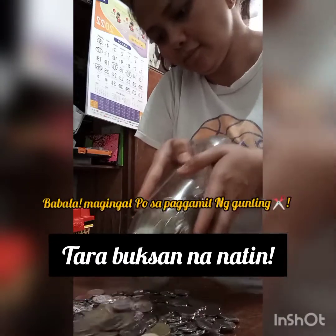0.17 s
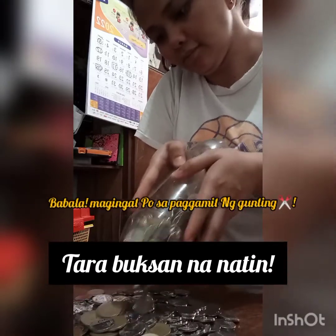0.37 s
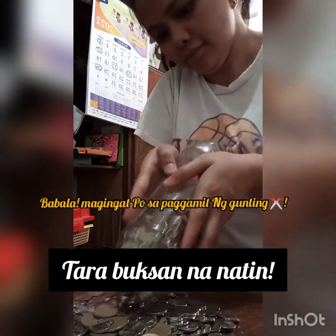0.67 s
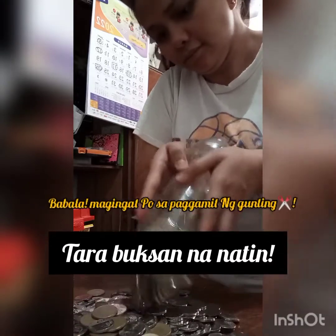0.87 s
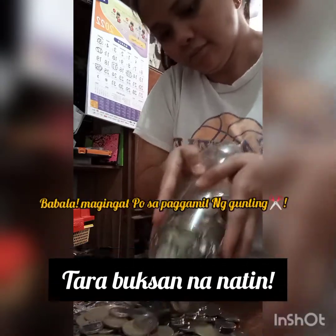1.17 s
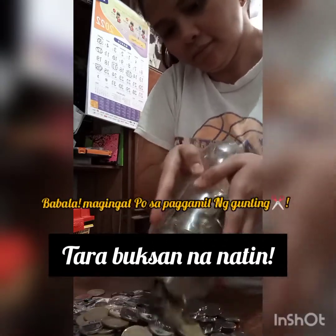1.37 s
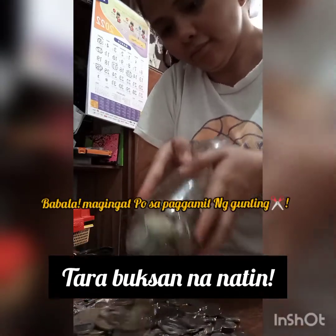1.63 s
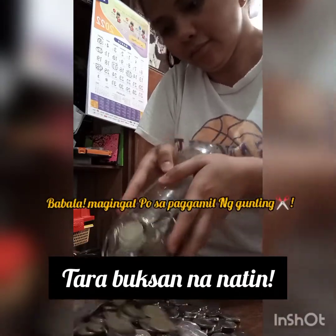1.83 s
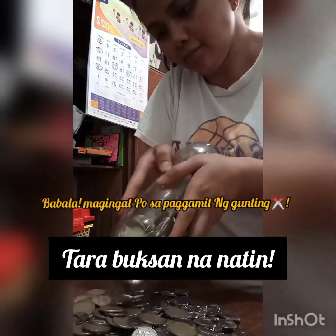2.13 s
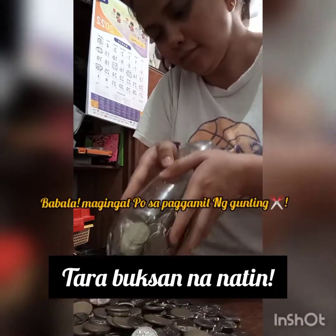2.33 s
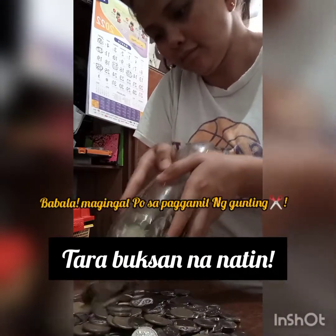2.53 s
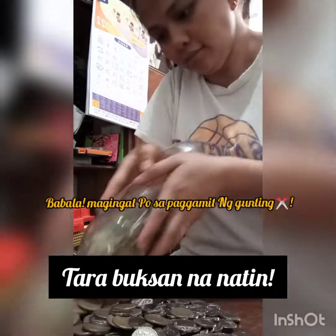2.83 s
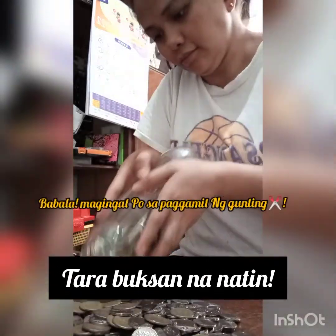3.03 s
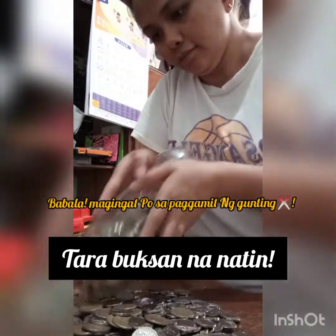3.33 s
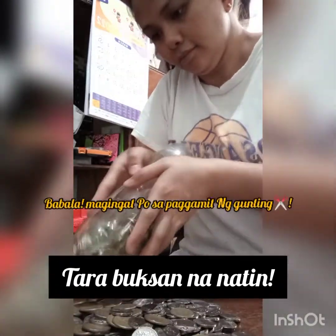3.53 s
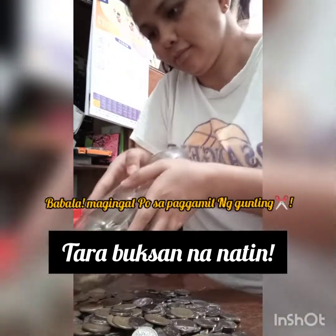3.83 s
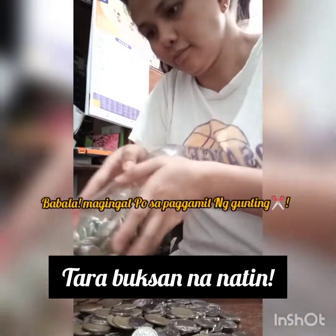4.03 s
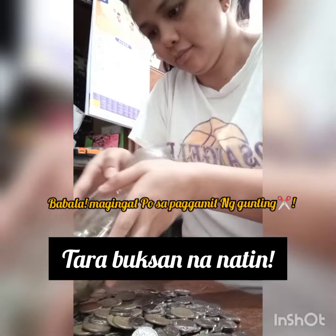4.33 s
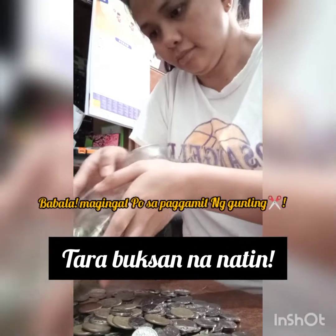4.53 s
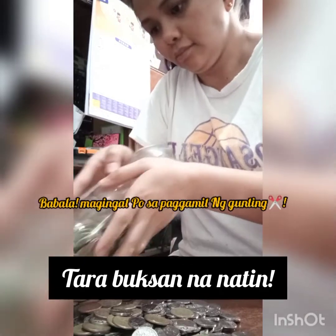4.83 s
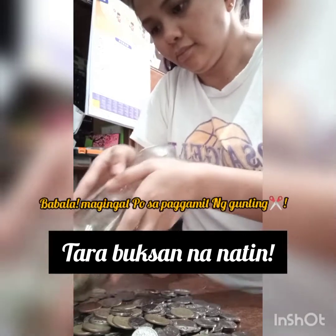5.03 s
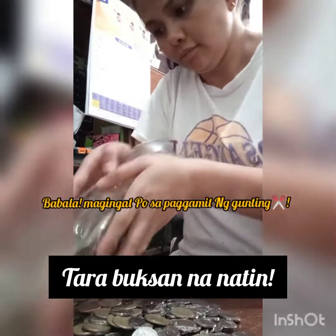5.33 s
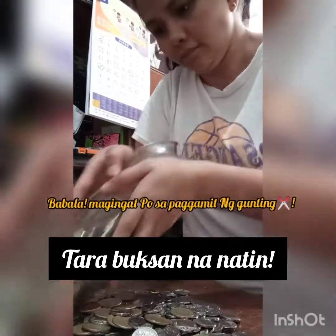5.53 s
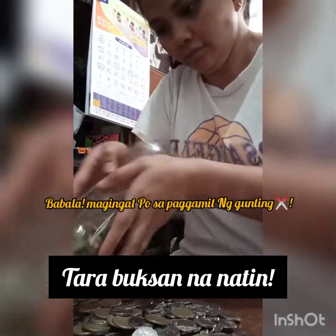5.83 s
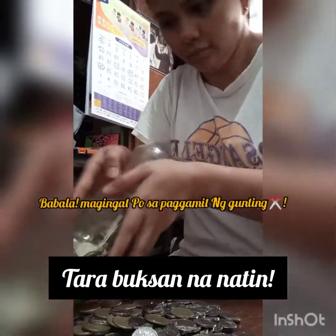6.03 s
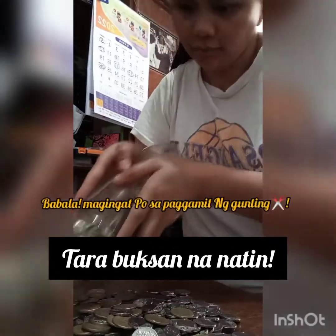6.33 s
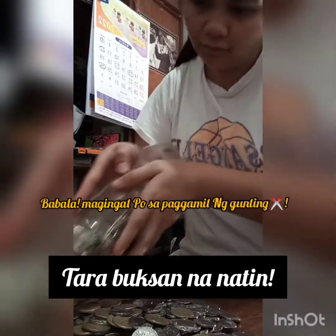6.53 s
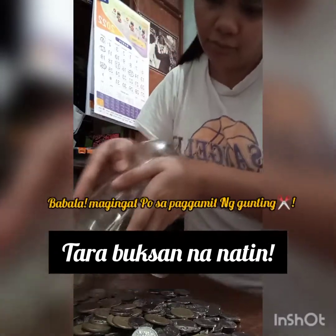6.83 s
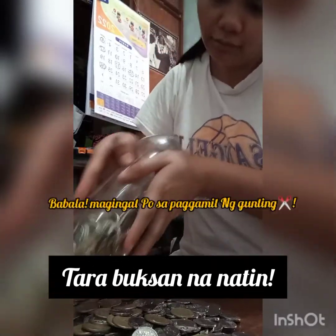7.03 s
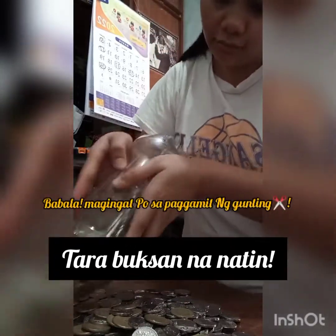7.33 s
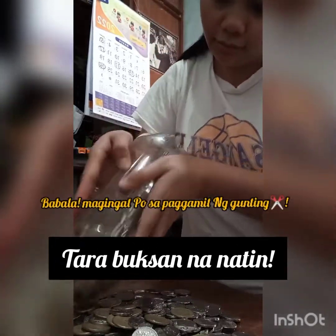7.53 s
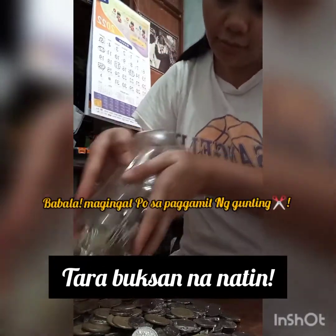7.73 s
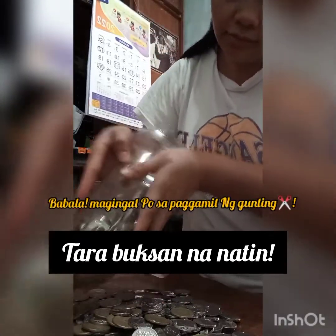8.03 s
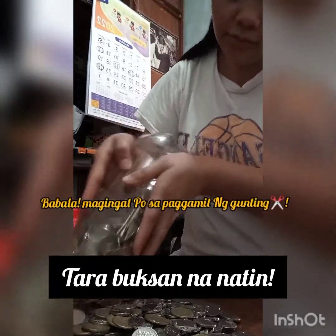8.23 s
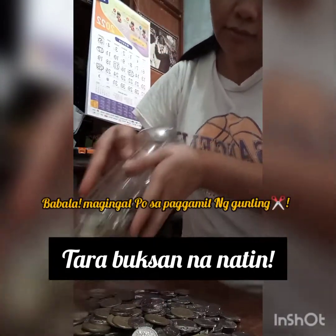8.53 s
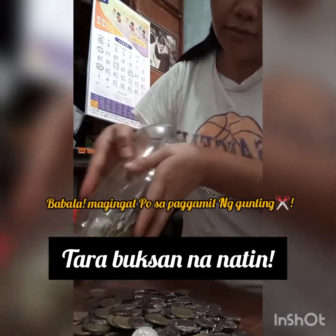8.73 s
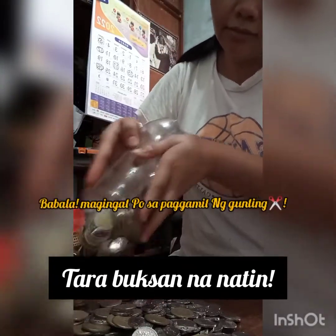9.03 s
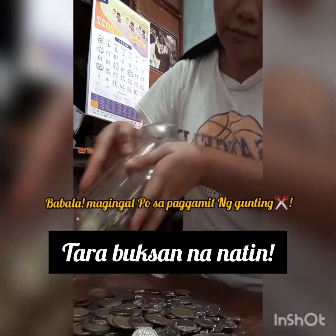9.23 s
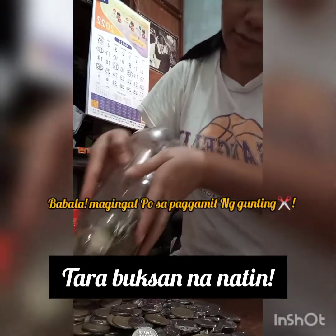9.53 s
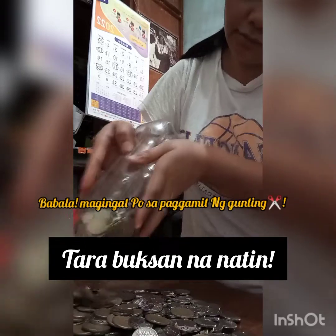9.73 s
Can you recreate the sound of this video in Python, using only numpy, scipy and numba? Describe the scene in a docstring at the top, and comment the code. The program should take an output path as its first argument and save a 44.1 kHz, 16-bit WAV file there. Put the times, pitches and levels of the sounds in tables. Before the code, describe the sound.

A dense, steady metallic rattle pulses four to five times a second as a coin-filled plastic bottle is shaken out over a table.

```python
"""A plastic bottle of coins, close to a small microphone, shaken four to five times a second over a table.
It pours onto a heap of coins: each collision is a noisy rattle of contact and briefly ringing coin modes.
The load raps the bottle too, and its wall and air hum in modes of their own.
Behind it: knocks of the table under the microphone, the short dull tails of a small room, and room tone."""
import sys
import numpy as np
from scipy import signal
from scipy.io import wavfile
from numba import njit

SR = 44100
rng = np.random.default_rng(int(sys.argv[2]) if len(sys.argv) > 2 else 0)


def put_to_file(sound):
    """Save the sound as 16-bit audio at rate SR, in the file named by the first command-line argument."""
    columns = np.atleast_2d(sound).T  # one column per channel
    safe = np.clip(columns, -1, 1)
    whole_steps = np.round(safe * 32767)
    wavfile.write(sys.argv[1], SR, whole_steps.astype(np.int16))


N = 436149  # length in samples


def amp(db):
    """Amplitude of a level in dB."""
    return 10 ** (np.asarray(db) / 20)


def evened(x):
    """Scales to rms 1."""
    return x / np.sqrt(np.mean(x ** 2) + 1e-20)


def curves(rows, s):
    """Reads every column of a table at times s."""
    at, *columns = np.transpose(rows)
    return [np.interp(s, at, column) for column in columns]


def coloured(x, points):
    """Causal minimum-phase filter with the given spectrum, its taps scaled to unit energy."""
    hz, db = np.transpose(points)
    f = np.abs(np.fft.fftfreq(4096, 1 / SR))
    log_gain = np.interp(np.log(f + 1), np.log(hz), db) * np.log(10) / 20
    spectrum = np.exp(np.conj(signal.hilbert(log_gain)))
    taps = np.fft.ifft(spectrum).real[:2048]
    return signal.oaconvolve(x, taps / np.linalg.norm(taps))[:N]


@njit
def rings(start, turn, fade, size, length, rise, total):
    """Sums dying sines, each swelling in from its own start."""
    out = np.zeros(total)
    for k in range(len(start)):
        z, step, missing = size[k] + 0j, fade[k] * np.exp(1j * turn[k]), 1.
        for n in range(start[k], min(start[k] + length[k], total)):
            out[n] += z.imag * (1 - missing)
            z *= step
            missing *= rise
    return out


def struck(s, size, modes, uneven_db, drift_db, rise_s):
    """Every blow rings all modes, detuned and weighted by piece and place; rms 1 per unit blow a second."""
    hz, spread, db, t60 = np.transpose(modes)
    detune, place, touch = rng.standard_normal((len(s), len(hz), 3)).transpose(2, 0, 1)
    # the load shifts about ten times a second
    knots = rng.standard_normal((len(hz), 2, 100))
    drift, lean = (np.transpose([np.interp(s * 10, np.arange(100), k[j]) for k in knots]) for j in range(2))
    ring_s = t60 * np.exp(0.27 * touch)  # neighbours damp each ring by chance
    weight = amp(db + uneven_db * np.clip(place, -2, 2) + drift_db * drift)
    weight /= np.sqrt(np.mean(np.sum(weight ** 2 * ring_s, 1)) / (4 * np.log(1000)))
    start = np.repeat((s * SR).astype(int), len(hz))
    pitch_hz = np.clip(hz + spread * (0.6 * detune + 0.8 * lean), 50, SR / 2.1)
    turn = 2 * np.pi * pitch_hz.ravel() / SR
    fade = 1000 ** (-1 / (ring_s.ravel() * SR))
    length = (ring_s.ravel() * SR / 2).astype(np.int64)  # each ring is cut 30 dB down
    blow = (weight * size[:, None]).ravel()
    return rings(start, turn, fade, blow, length, np.exp(-1 / (rise_s * SR)), N)


def rattle(s, size, points, chatter_s):
    """Bare contacts chatter for a few milliseconds: noise bursts through a spectrum; rms 1 per unit blow a second."""
    power = np.zeros(N)
    np.add.at(power, (s * SR).astype(int), size ** 2 * SR)
    for time_s in (chatter_s, chatter_s / 4):  # slow decay, then a quicker smoothing of the onset
        keep = np.exp(-1 / (time_s * SR))
        power = signal.lfilter([1 - keep], [1, -keep], power)
    return coloured(np.sqrt(power) * rng.standard_normal(N), points)


def collisions(level_db, count, spread_db):
    """Random times, crowded where the load moves hardest, and sizes, mostly small, that add up to the level."""
    when, size = rng.random((count, 2)).T
    crowd = amp(level_db / 2)
    crowd /= crowd.mean()
    share = (np.arange(count) + when) / count
    at = np.searchsorted(np.cumsum(crowd) / N, share).clip(0, N - 1)
    size = evened(amp(-spread_db * np.log(size + 0.036)))
    return at / SR, size * amp(level_db[at]) * np.sqrt(N / SR / count / crowd[at])


# Spectrum of the quiet room: f/Hz, level/dB (relative)
ROOM_TONE_SPECTRUM = [(30, -1.5), (1000, -2), (15000, -12)]
ROOM_TONE_DB = -62


def room_tone():
    """Steady noise through the spectrum of the quiet room."""
    return amp(ROOM_TONE_DB) * coloured(rng.standard_normal(N), ROOM_TONE_SPECTRUM)


ROOM_T60, ROOM_DB = 0.069, -10  # decay in s, level of the tails against the near sound


def room(x):
    """A small room: three short dull noise tails mixed in turning shares, so that no one colour stands out."""
    t, turn = np.arange(SR // 4) / SR, 2 * np.pi * 3.1 * np.arange(N) / SR
    dull = signal.lfilter([.6], [1, -.4], rng.standard_normal((3, len(t))))
    tails = dull * amp(-60 * t / ROOM_T60) * (t > .004)
    shares = np.sqrt(2 / 3) * np.cos(turn + np.arange(3)[:, None] * np.pi / 3)
    return signal.oaconvolve(x * shares, tails / np.linalg.norm(tails[0]), axes=1).sum(0)[:N]


# Knocks carried by the table: t/s, level/dB (scale of the swing), length of the first dip/s
TABLE_THUMPS = [(4.859, -21.5, 0.0012), (8.51, -33, 0.0045), (9.223, -30, 0.0015)]
TABLE_HZ = 100


def thumps():
    """A first dip, then a heavily damped swing of the table top under the microphone."""
    out, t = np.zeros(N), np.arange(3000) / SR
    for s, db, dip_s in TABLE_THUMPS:
        dip = -1.3 * np.sin(np.pi * t / dip_s) * (t < dip_s)
        after = np.maximum(t - dip_s, 0)
        swing = np.sin(2 * np.pi * TABLE_HZ * after) * np.exp(-after / 0.0022)
        part = out[round(s * SR):][:len(t)]
        part += amp(db) * (dip + swing)
    return out


# Tilt and grip: t/s, level/dB of sliding clatter, level/dB of small coins against it,
# level/dB of bottle tap and ring of wall and air against the rap
GRIP_CURVES = [(0.0, -44, 7.5, -10.5), (0.7, -45, 8, -9.5), (1.16, -40, 8.5, -5), (1.75, -38.5, 2, -7.5),
               (2.33, -42, 4.5, -5), (2.91, -39.5, -2.5, -8.5), (3.49, -41, -3, -7.5), (4.2, -45, 0, -2.5),
               (4.23, -42, 7, -16.5), (4.65, -42, 3.5, -1), (5.82, -41, -11, -6), (6.4, -45, -3, -2),
               (6.98, -43, -5, -4.5), (7.56, -42, -12, -3.5), (8.14, -42, -3, 0.5), (8.73, -44, 1, -3.5),
               (9.31, -41, -5, -3.5), (9.89, -38, -4, -6)]
# Strokes that throw the load against the plastic: t/s (start), length/s, level/dB of the rap
LOAD_STROKES = [(0.027, 0.033, -42.5), (0.262, 0.017, -41), (0.481, 0.029, -41.0), (0.704, 0.032, -41.5),
                (0.938, 0.038, -38.0), (1.155, 0.029, -44.5), (1.36, 0.06, -46.0), (1.576, 0.075, -46.5),
                (1.815, 0.06, -48.5), (1.973, 0.33, -54.0), (2.487, 0.016, -42.5), (2.695, 0.02, -46.0),
                (2.922, 0.025, -44.0), (3.037, 0.16, -51), (3.324, 0.063, -52.5), (3.556, 0.031, -49.5),
                (3.771, 0.02, -42), (3.96, 0.035, -46.0), (4.185, 0.03, -44), (4.238, 0.19, -45),
                (4.549, 0.073, -48.5), (4.785, 0.09, -44.5), (5.022, 0.031, -42), (5.221, 0.037, -45.5),
                (5.434, 0.025, -43.0), (5.638, 0.018, -47.0), (5.87, 0.017, -41.0), (6.066, 0.033, -44.0),
                (6.297, 0.031, -44.5), (6.482, 0.067, -47.5), (6.723, 0.04, -44.0), (6.927, 0.03, -39.5),
                (7.146, 0.048, -48.0), (7.367, 0.054, -40.0), (7.601, 0.031, -38.5), (7.813, 0.032, -35.5),
                (8.008, 0.025, -46), (8.05, 0.045, -39.5), (8.287, 0.044, -49.5), (8.509, 0.06, -43.0),
                (8.747, 0.034, -45.5), (8.961, 0.03, -44.5), (9.061, 0.1, -52.0), (9.209, 0.022, -40.0),
                (9.433, 0.031, -41.5), (9.602, 0.09, -48.5), (9.847, 0.04, -46.0)]
# Moments when the coins stop sliding: t/s (start), t/s (end), level/dB (depth)
SLIDING_LULLS = [(0.354, 0.402, 12), (0.561, 0.642, 8), (0.74, 0.834, 13), (2.327, 2.44, 5),
                 (3.418, 3.52, 7), (3.788, 3.941, 17), (3.992, 4.157, 14), (4.42, 4.497, 8),
                 (5.26, 5.33, 8.5), (5.454, 5.545, 25.5), (5.661, 5.704, 13), (6.091, 6.221, 12),
                 (6.547, 6.689, 9.5), (6.972, 7.063, 11), (7.169, 7.271, 15), (7.418, 7.498, 8.5),
                 (7.63, 7.73, 15), (7.881, 8, 8), (8.169, 8.269, 10), (8.77, 8.941, 12.5)]
SWELL_DB_PER_S, SETTLE_DB_PER_S = 519.5, 420.5  # the load arrives, then comes to rest
STROKE_CLATTER_DB = 0.99  # coin on coin against the rap in a stroke
SLIDE_RAP_DB = -14.5  # rap of sliding coins against their clatter
HUSH_S, RESUME_S = .04, .008  # a lull deepens gradually and ends abruptly


def motion():
    """Levels of rap and clatter in dB: strokes over coins that slide except in the lulls."""
    t = np.arange(0, N / SR, .002)
    start, length, db = np.transpose(LOAD_STROKES)[..., None]
    swell_db = SWELL_DB_PER_S * np.maximum(start - t, 0)
    settle_db = SETTLE_DB_PER_S * np.maximum(t - start - length, 0)
    strokes = np.sum(amp(db - swell_db - settle_db) ** 2, 0)
    start, end, depth_db = np.transpose(SLIDING_LULLS)[..., None]
    still = np.clip(np.minimum((t - start) / HUSH_S, (end - t) / RESUME_S + 1), 0, 1)
    slides = amp(curves(GRIP_CURVES, t)[0] - np.sum(depth_db * still, 0)) ** 2
    rap = strokes + amp(SLIDE_RAP_DB) ** 2 * slides
    clatter = amp(STROKE_CLATTER_DB) ** 2 * strokes + slides
    return [np.interp(np.arange(N) / SR, t, 10 * np.log10(power)) for power in (rap, clatter)]


# Single coins that strike the bottle wall: t/s, level/dB (before the mix gains)
WALL_KNOCKS = [(4.2126, -19.5), (4.2237, -22.5), (6.325, -35), (6.383, -31.5), (6.464, -35), (7.739, -34.5),
               (9.073, -34), (9.138, -33)]


def knocks():
    """A coin on the wall: a dull tap, and every mode of the wall at once, close to its usual pitch."""
    s, db = np.transpose(WALL_KNOCKS)
    steady_modes = np.multiply(WALL_MODES, [1, .3, 1, 1])  # narrower pitch spread
    wall = struck(s, amp(db), steady_modes, uneven_db=1.5, drift_db=0, rise_s=0.0004)
    tap = rattle(s, amp(db), PLASTIC_SPECTRUM, chatter_s=0.0012)
    return amp(-30.5) * wall + amp(-35.5) * tap


# Runs of coins that keep one note of the bottle sounding: t/s (start), length/s, f/Hz, level/dB
NOTE_RUNS = [(0.927, 0.02, 743, -46.5), (0.995, 0.16, 351, -51.5), (1.819, 0.093, 757, -55.5),
             (2.004, 0.17, 1820, -54.5), (2.017, 0.15, 2120, -52.5), (2.49, 0.046, 191, -53),
             (2.73, 0.17, 1137, -56), (3.011, 0.18, 1866, -52), (3.088, 0.15, 895, -53.5),
             (3.2, 0.22, 1176, -58), (4.25, 0.16, 1196, -53.5), (4.235, 0.18, 2117, -49.5),
             (4.598, 0.34, 2116, -54), (4.703, 0.2, 1210, -55.5), (4.853, 0.22, 2090, -51),
             (5.027, 0.11, 1207, -50.5), (5.223, 0.084, 1190, -50), (5.641, 0.033, 857, -50),
             (5.805, 0.044, 886, -53.5), (6.3, 0.029, 178, -50), (6.385, 0.04, 495, -54),
             (7.152, 0.011, 695, -49), (7.364, 0.068, 680, -48), (7.791, 0.074, 775, -48.5),
             (8.029, 0.053, 813, -44), (8.123, 0.097, 500, -53.5), (8.6, 0.14, 410, -55.5),
             (9.049, 0.15, 1814, -52.5)]
RUN_HITS_PER_S, RUN_T60, RUN_FADE_DB = 300, .07, -4  # mean rate, ring in s, fade over a run


def runs():
    """A quick patter of small blows rings a single mode and weakens as the coins run out."""
    out, t = np.zeros(N), np.arange(SR // 2) / SR
    shape = (len(NOTE_RUNS), len(t))
    hits, sizes = rng.random(shape), rng.standard_normal(shape)
    r = 1000 ** (-1 / (RUN_T60 * SR))
    for (s, length, hz, db), hit, size in zip(NOTE_RUNS, hits, sizes):
        patter = (hit < RUN_HITS_PER_S / SR) * size * (t < length) * amp(RUN_FADE_DB * t / length)
        patter[0] = 1
        note = signal.lfilter([1], [1, -2 * r * np.cos(2 * np.pi * hz / SR), r * r], patter)
        out[round(s * SR):][:len(t)] += amp(db) * evened(note) * np.sqrt(length / t[-1])
    return out


# Loud single collisions: t/s, level/dB of large coins, level/dB of small coins (before the mix gains)
COIN_CLINKS = [(0.45, -45, -14), (0.651, -47.5, -23), (0.966, -28.5, -31), (1.074, -38, -23),
               (2.485, -27.5, -37), (3.673, -48, -42), (4.2253, -30.5, -18), (4.504, -43, -23),
               (4.8578, -23, -14), (5.55, -46, -32), (5.6451, -32, -40), (5.871, -30.5, -53),
               (6.72, -32, -32), (7.155, -30.5, -44), (7.6053, -31, -42), (8.287, -32, -42),
               (8.977, -33, -20)]


def clinks():
    """The loudest collisions ring the coins; the large coins' blow rings and taps the plastic too."""
    s, large_db, small_db = np.transpose(COIN_CLINKS)
    large, small = amp(large_db), amp(small_db)
    metal = amp(-28) * struck(s, large, LARGE_COIN_MODES, uneven_db=3, drift_db=0, rise_s=0.0003)
    metal += amp(-28.5) * struck(s, small, SMALL_COIN_MODES, uneven_db=3, drift_db=0, rise_s=0.0003)
    metal += amp(-27) * rattle(s, large, METAL_SPECTRUM, chatter_s=0.003)
    bottle_modes = RAP_MODES + WALL_MODES + HOLLOW_MODES
    plastic = amp(-34.5) * struck(s, large, bottle_modes, uneven_db=4.5, drift_db=-5.5, rise_s=0.00036)
    plastic += amp(-31) * rattle(s, large, PLASTIC_SPECTRUM, chatter_s=0.003)
    return metal + plastic


# Modes of the bottle: f/Hz, spread between blows f/Hz, level/dB (relative), typical t60 t/s
RAP_MODES = [(2569, 283, -7, 0.068), (3245, 378, -4, 0.048), (3968, 334, -3.5, 0.055),
             (4910, 400, -0.3, 0.049), (6110, 303, 4.5, 0.039)]  # plastic rapped from inside
WALL_MODES = [(1190, 60, 7.15, 0.04), (1520, 48.5, -2, 0.046), (1815, 45, 1.5, 0.045),
              (2100, 40, 4.5, 0.04)]  # wall
HOLLOW_MODES = [(174, 23, -5.5, 0.086), (450.6, 66, 1.5, 0.062), (719.5, 97, 5.5, 0.035),
                (861, 78, 6, 0.024)]  # enclosed air
# Contact on plastic: f/Hz, level/dB (relative)
PLASTIC_SPECTRUM = [(60, -69), (250, -12.5), (1500, -18), (3000, -11), (6000, -9), (9000, -82.5)]


def bottle():
    """Coins rap the plastic from inside; fewer, heavier blows ring wall and air as freely as the hands let them."""
    rap_db, clatter_db = motion()
    s, size = collisions(rap_db, count=2600, spread_db=4.5)
    rap = amp(2.5) * struck(s, size, RAP_MODES, uneven_db=4.5, drift_db=2.5, rise_s=0.00095)
    tap_size = size * amp(curves(GRIP_CURVES, s)[2] - 1)
    rap += rattle(s, tap_size, PLASTIC_SPECTRUM, chatter_s=0.0015)
    # coins sliding between strokes keep the wall and the air sounding
    hum_db = rap_db + .4 * (clatter_db - rap_db)
    s, size = collisions(hum_db, count=2000, spread_db=6.0)
    size = size * amp(curves(GRIP_CURVES, s)[2])
    wall = struck(s, size, WALL_MODES, uneven_db=7.5, drift_db=-1.0, rise_s=0.0031)
    hollow = struck(s, size, HOLLOW_MODES, uneven_db=3.0, drift_db=1.0, rise_s=0.0033)
    return rap + amp(-1.0) * wall + amp(-2.5) * hollow


# Modes of the coins by size: f/Hz, spread between blows f/Hz, level/dB (relative), typical t60 t/s
LARGE_COIN_MODES = [(7540, 91, 4, 0.025), (8004, 178, -4, 0.07), (8350, 700, 4, 0.018),
                    (11030, 2300, -7.5, 0.024)]
MIDDLE_COIN_MODES = [(13530, 150, 0, .06), (14030, 120, -1, .06)]
SMALL_COIN_MODES = [(15550, 380, 15, 0.023), (15000, 180, 3.2, 0.024), (15400, 220, 10.4, 0.049),
                    (14700, 250, 2, 0.024)]
# Contact of metal on metal: f/Hz, level/dB (relative)
METAL_SPECTRUM = [(1500, -57), (4000, -20.5), (7500, 6), (10000, -4.5), (12500, -10), (15000, -32)]


def coins():
    """Coin on coin: fine contacts rattle; fewer, harder ones ring coins of three sizes, the smallest highest."""
    clatter_db = motion()[1]
    s, size = collisions(clatter_db, count=6000, spread_db=14.0)
    fine = rattle(s, size, METAL_SPECTRUM, chatter_s=0.0016)
    s, size = collisions(clatter_db, count=3000, spread_db=2.5)
    large = amp(1.0) * struck(s, size, LARGE_COIN_MODES, uneven_db=6.5, drift_db=5.0, rise_s=0.0022)
    small_size = size * amp(curves(GRIP_CURVES, s)[1])
    small = amp(2.0) * struck(s, small_size, SMALL_COIN_MODES, uneven_db=5.0, drift_db=6.5, rise_s=0.00053)
    middle = amp(-12.0) * struck(s, size, MIDDLE_COIN_MODES, uneven_db=10.0, drift_db=6.0, rise_s=0.0017)
    hard = rattle(s, size, METAL_SPECTRUM, chatter_s=0.0023)
    return large + middle + small + amp(-7.5) * (fine + hard)


def scene():
    """Coins and bottle close by, the room behind them, table knocks and room tone added dry."""
    near = coins() + bottle() + runs() + clinks() + knocks()
    return (near + amp(ROOM_DB) * room(near) + thumps() + room_tone())[None]


EDGE_HZ = 15800  # upper band limit


def record(dry):
    """The small microphone loses the deepest bass; then the band limit."""
    thin = signal.lfilter(*signal.butter(2, 60, "high", fs=SR), dry)
    lowpass = signal.firwin(1023, EDGE_HZ, window=("kaiser", 9), fs=SR)
    return signal.oaconvolve(thin, lowpass[None], "same")


dry = scene()
out = record(dry)
put_to_file(out)
```